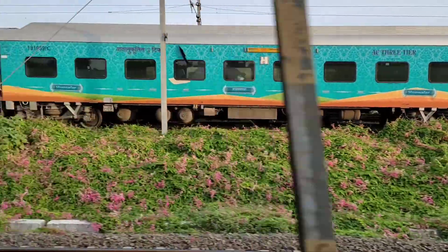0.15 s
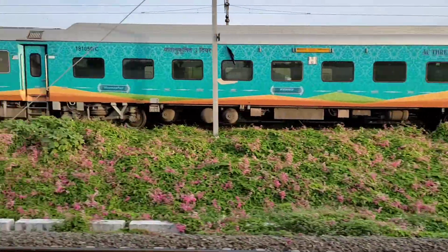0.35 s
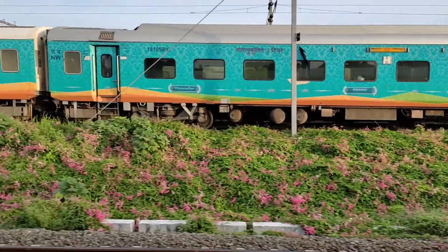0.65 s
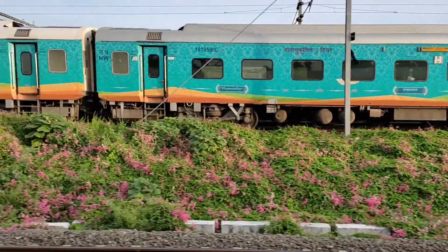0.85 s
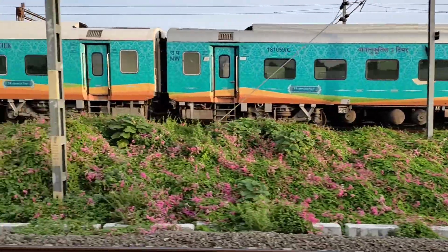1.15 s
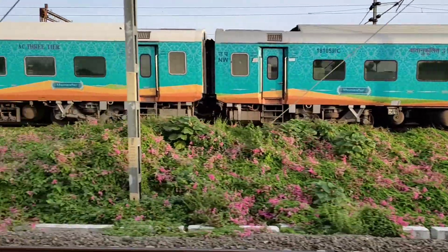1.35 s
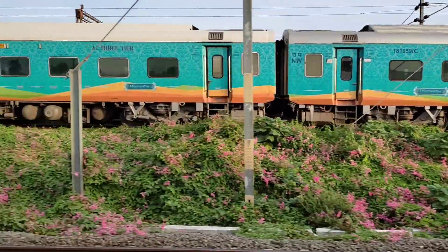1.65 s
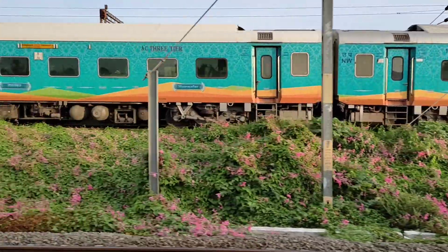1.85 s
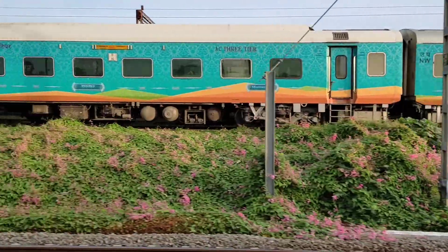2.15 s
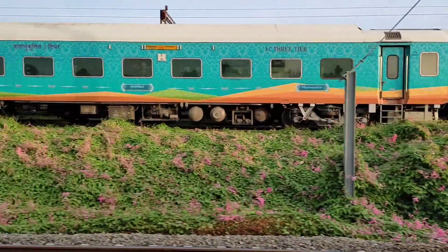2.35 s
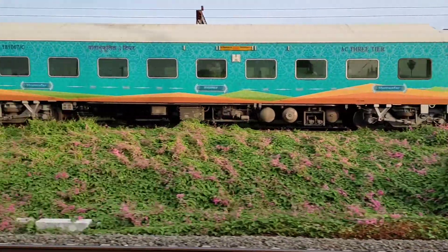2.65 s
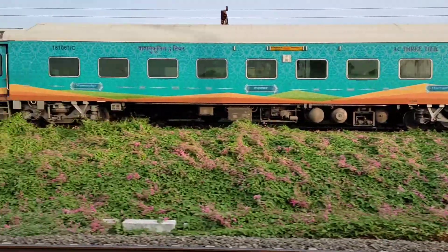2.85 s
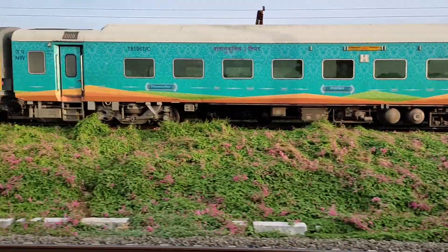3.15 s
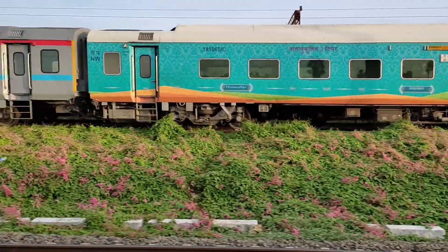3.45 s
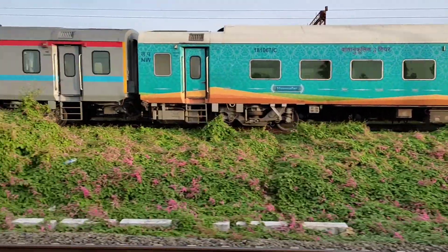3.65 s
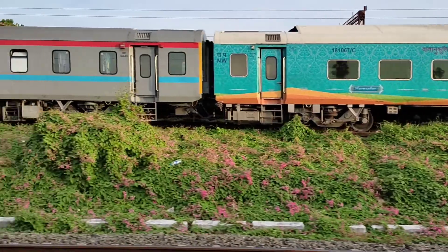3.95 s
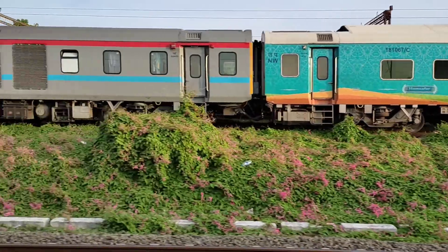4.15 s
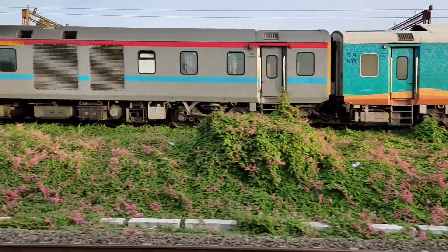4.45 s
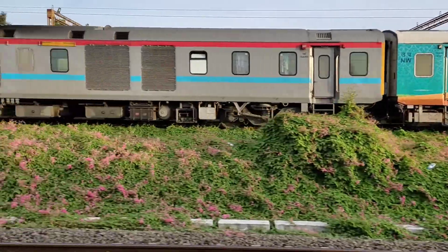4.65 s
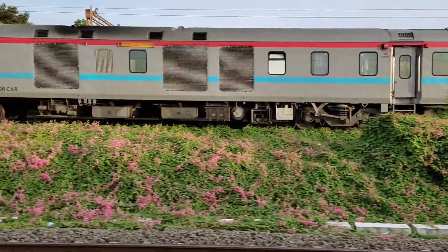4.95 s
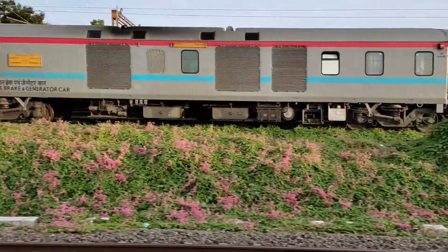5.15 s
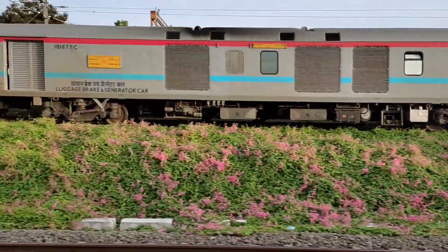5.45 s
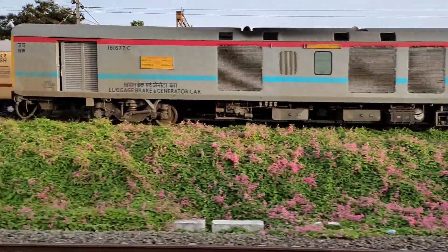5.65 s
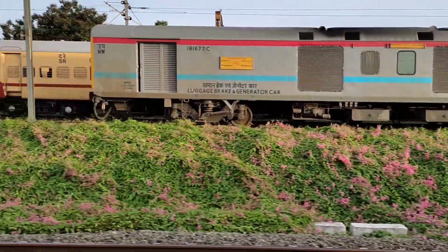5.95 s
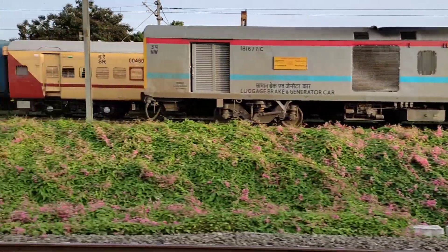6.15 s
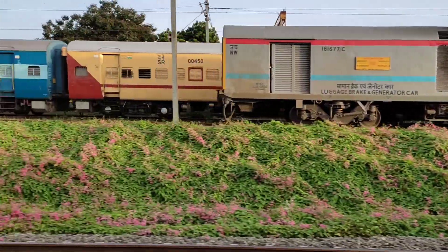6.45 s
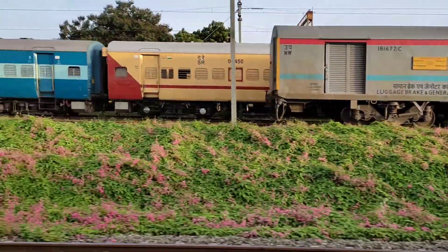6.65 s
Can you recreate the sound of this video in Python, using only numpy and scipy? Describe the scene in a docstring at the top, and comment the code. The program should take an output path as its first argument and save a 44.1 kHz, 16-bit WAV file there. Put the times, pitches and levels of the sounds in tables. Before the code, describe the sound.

Heard from the open door of a moving train, wheels roar steadily on the rails with a thin hiss and a low coach drone. Irregular thumps and rattles mark the rail welds, while gusts of wind buffet and pop on the microphone. About halfway through, the locomotive horn gives a quick high blip, then one short, lower, brassy blast with a slightly higher echo. A strong gust follows, and the rolling continues.

```python
"""A locomotive's horns, heard at the open door of the running train: the high horn blips, then the low
one blows once, its diaphragm chopping air into a brassy stack of harmonics. The blast comes back from
things ahead, raised in pitch by the train's own speed. Underneath, wheels roar on the rails and thump
over welds, bogie by bogie, and the coach drones, while the slipstream buffets the microphone and makes
the gain control duck."""
import sys
import numpy as np
from scipy import signal
from scipy.fft import rfft, irfft, next_fast_len
from scipy.io import wavfile
from scipy.ndimage import uniform_filter1d, minimum_filter1d, map_coordinates

SR = 44100
rng = np.random.default_rng(int(sys.argv[2]) if len(sys.argv) > 2 else 0)


def wav_record(signal):
    """Record a signal, one row per channel, as 16-bit PCM in the file named by sys.argv[1]."""
    frames = np.transpose(np.atleast_2d(signal))
    bounded = np.clip(frames, -1, 1)
    # unit amplitude maps onto the largest positive 16-bit level
    quanta = np.round(bounded * 32767).astype(np.int16)
    wavfile.write(sys.argv[1], SR, quanta)


N = 300223

# rolling bed, as the track grows rougher and smoother: (time [s], relative roar [dB], hiss [dB])
TRACK_ROUGHNESS = [(0, -48, -66), (.3, -51, -61), (1.2, -48, -68.5), (1.7, -49, -65), (1.95, -47.5, -62.5),
                   (2.8, -50, -63.5), (3.2, -46.5, -60), (4.2, -47, -63), (4.8, -46.5, -66),
                   (5.15, -48, -63.5), (6.2, -48, -67.5), (6.81, -50, -65.5)]
# resonances of the coach body and of the wheels: (frequency [Hz], width [Hz], relative level [dB])
COACH_MODES = [(184.8, 69, 16.5), (292, 60, 9.5)]
WHEEL_MODES = [(1150, 270, -6), (1400, 420, -6.5), (1819, 59, 4.5), (2113, 51, 2), (2368, 78, 5),
               (2680, 50, 0.5), (3204, 210, -5.5)]
# wheels hitting rail welds: (time [s], thump gain [dB], relative rattle [dB])
WELD_HITS = [(0.558, 3, -49), (0.843, -0.5, -51), (1.782, 1.5, -49), (2.065, 1.5, -50), (2.507, -24, -56.5),
             (2.872, -5.5, -68), (3.198, 0.5, -42), (4.573, -10.5, -52), (4.842, -4.5, -56),
             (5.908, -9, -58.5)]
# tone of the rail roar, rail hiss and gear rattle: (frequency [Hz], relative level [dB])
ROAR_EQ = [(60, -17), (200, 8), (500, 9), (900, 4.5), (1500, -1), (2500, -4.5), (3200, -12), (3900, -21),
           (5000, -26.5), (8000, -26.5)]
HISS_EQ = [(2000, -32.5), (3500, -6), (4800, -13.5), (5600, -7.5), (6200, 1.5), (7400, 3.5), (8000, -12.5)]
RATTLE_EQ = [(300, -2), (1000, 16.5), (2300, 8), (3500, 0.5), (5000, -8), (6500, -1.5), (8000, -4)]
# slipstream gusts: (start [s], length [s], deep surge [dB], buffet [dB], flutter [dB])
WIND_GUSTS = [(0, 0.12, -19.5, -19, -30.5), (0.139, 0.055, -20.5, -23, -39),
              (0.291, 0.045, -28, -19.5, -26), (0.382, 0.15, -21, -17.5, -28.5),
              (0.811, 0.074, -21.5, -20, -24), (0.915, 0.093, -19, -15, -21),
              (1.057, .025, -16.5, -20.5, -39), (1.151, 0.025, -19, -20.5, -35),
              (1.444, 0.053, -25, -21.5, -39), (1.499, .045, -26, -20.5, -30),
              (2.076, 0.057, -33, -20, -27.5), (2.198, 0.038, -16, -13, -29.5),
              (2.267, 0.077, -21.5, -22.5, -33.5), (2.403, 0.038, -24, -19, -30.5),
              (2.473, 0.05, -32.5, -19, -39.5), (2.589, 0.065, -24.5, -21, -38),
              (2.858, 0.051, -24, -26, -40), (3.184, .21, -22, -19.5, -30.5),
              (3.468, 0.026, -15.5, -27, -40), (3.908, 0.12, -20.5, -18, -51),
              (4.088, 0.019, -34, -16, -29), (4.236, 0.066, -16, -14.5, -28),
              (4.304, 0.11, -10, -8.5, -22.5), (4.509, 0.081, -17.5, -22.5, -30),
              (4.688, 0.049, -21.5, -15, -25), (4.8, 0.028, -17.5, -20.5, -33),
              (5.154, 0.088, -24, -21, -41.5), (5.293, .17, -18.5, -16.5, -29),
              (5.562, 0.11, -29, -20.5, -47), (5.862, 0.055, -21, -20, -31), (5.956, 0.07, -15, -18.5, -28),
              (6.209, .13, -19.5, -20.5, -30), (6.45, 0.1, -18, -18, -25.5),
              (6.603, 0.042, -26, -16.5, -29), (6.79, .04, -20, -15, -24)]
# tone of the wind layers, deepest first: (frequency [Hz], relative level [dB])
SURGE_EQ = [(15, -26), (30, -20), (45, -9), (65, -2), (90, 2), (125, -9.5), (250, -44.5), (600, -83)]
BUFFET_EQ = [(30, -47.5), (70, -19), (110, 1), (180, -3), (260, -8), (400, -21.5), (800, -34), (2000, -76)]
FLUTTER_EQ = [(100, -26), (250, 5), (380, 5), (550, -6), (800, -10.5), (1200, -22.5), (2000, -38),
              (4000, -63.5)]
PUFF_EQ = [(120, -10), (330, 8.5), (500, 6.5), (900, -5.5), (1400, -15), (2200, -31.5), (4000, -52.5),
           (8000, -61)]
# swells of air pressure, too slow to hear: (start [s], peak [dB])
PRESSURE_SWELLS = [(0, -0.5), (0.438, 0.5), (.55, 6), (0.859, -0.5), (.97, 2.5), (2.19, 3.5), (4.27, 7),
                   (4.4, 6.5), (4.59, 5), (5.35, 2.5), (5.948, 1), (6.45, 1.5)]
# hard single eddies hitting the microphone port: (time [s], level [dB])
EDDY_HITS = [(.044, -16.5), (0.13, -19.5), (.464, -20.5), (.492, -21), (.817, -16), (.936, -23),
             (.953, -16), (1.004, -15), (1.507, -23), (2.208, -14.5), (2.281, -21.5), (2.483, -24),
             (2.799, -27), (3.342, -25), (4.1, -27), (4.296, -20.5), (4.361, -11), (4.389, -8.5),
             (4.502, -11.5), (4.509, -10.5), (4.716, -20), (5.173, -15.5), (5.442, -16.5), (5.949, -18),
             (6.233, -18.5), (6.465, -25), (6.621, -17)]
# eddies that overload the microphone: (time [s], relative level [dB])
OVERLOADS = [(1.006, -27), (2.2102, -21), (4.3, -35)]
# the echo's tone, duller from farther off: (frequency [Hz], early level [dB], late level [dB])
ECHO_EQ = [(307, 0, 1), (615, -8, -9), (922, -8, -8), (1230, -11, -14), (1538, -8, -8), (1845, -14, -15),
           (2150, -12, -16), (2460, -15, -19), (2770, -20, -27), (3080, -19, -25), (4000, -23, -34),
           (4800, -38, -47), (6200, -28, -39), (7500, -31, -43)]
# the high horn's blip: (time [s], pitch [Hz], level [dB])
HIGH_HORN_BLIP = [(3.25, 364, -44), (3.28, 364, -22), (3.305, 358.4, -21.5), (3.33, 355, -25.5),
                  (3.36, 369, -42), (3.45, 389, -52.5)]
# the high horn's tone: (frequency [Hz], level [dB])
HIGH_HORN_EQ = [(360, -15), (720, 5), (1080, -32.5), (1440, -20), (2200, -48), (5000, -61)]
# the low horn's bell along a changing path: (frequency [Hz], early level [dB], late level [dB])
LOW_HORN_EQ = [(292, 2, 2), (584, -1, -0.5), (876, -0.5, 1.5), (1168, -2, -3), (1460, -10, -13),
               (1752, -6.5, -9), (2044, -18, -10), (2336, -6, -16), (2630, -18, -19), (2920, -19, -21),
               (3212, -32, -30), (3500, -28, -30), (4100, -39, -37), (4700, -44, -43), (6000, -32, -41),
               (7400, -32, -41)]

TOP_HZ = 7560  # ceiling for the horn harmonics and the whole mix


def amp(db):
    """Decibels to gain."""
    return 10 ** (np.asarray(db) / 20)


def unit(x):
    """Scale to rms 1."""
    return x / np.sqrt(np.mean(x ** 2) + 1e-20)


def along(points, hz):
    """Read (frequency [Hz], value) points on a log axis."""
    freqs, values = np.transpose(points)
    return np.interp(np.log(hz + 1), np.log(freqs + 1), values)


def curves(rows):
    """One automation curve for each column after the time."""
    times, *columns = np.transpose(rows)
    return [np.interp(np.arange(N) / SR, times, column) for column in columns]


def ramp(start, end):
    """Fade from 0 to 1 between two times in seconds."""
    return np.clip((np.arange(N) / SR - start) / (end - start), 0, 1)


def envelope(start, length, attack, release):
    """Rise from the start, hold to the end of the length, then die away (all in seconds)."""
    t = np.maximum(np.arange(N) / SR - start, 0)
    return (1 - np.exp(-t / attack)) * np.exp(-np.clip((t - length) / release, 0, 20))


def wobble(rate):
    """Smooth random modulation, rate knots a second."""
    return map_coordinates(rng.standard_normal(int(N * rate / SR) + 4), [np.arange(N) * rate / SR])


def filtered(x, response):
    """Shape x with a gain that depends on frequency."""
    size = next_fast_len(N + SR // 2)
    return irfft(rfft(x, size) * response(np.fft.rfftfreq(size, 1 / SR)), size)[:N]


def noise(eq):
    """Noise of rms 1 with the given spectrum."""
    return unit(filtered(rng.standard_normal(N), lambda hz: amp(along(eq, hz))))


def steadied(x, seconds):
    """Level out the slow swells of x and keep its fast churning."""
    size = int(seconds * SR)
    power = uniform_filter1d(uniform_filter1d(x ** 2, size), size)
    return x / np.sqrt(np.abs(power) + 1e-9)


def add(track, start, sound):
    """Mix a sound into the track at a start time in seconds."""
    part = track[max(round(start * SR), 0):][:len(sound)]
    part += sound[:len(part)]


def coach():
    """Shaken by the running gear, the coach body drones in step with the roar of the wheels."""
    roar_db, _ = curves(TRACK_ROUGHNESS)
    drone = np.zeros(N)
    for centre, width, db in COACH_MODES:
        band = filtered(rng.standard_normal(N), lambda hz: 1 / (1 + ((hz - centre) / width) ** 2) ** 2)
        drone += amp(roar_db + db) * unit(band)
    return drone


def rolling():
    """Rough steel on steel: a broad roar, the ringing of the wheels and a thin hiss."""
    def wheel_response(hz):
        modes = sum((-1) ** k * amp(db) * 1j * hz * width / (centre ** 2 - hz ** 2 + 1j * hz * width)
                    for k, (centre, width, db) in enumerate(WHEEL_MODES))
        return modes / (1 + (hz / 3300) ** 12)

    roar_db, hiss_db = curves(TRACK_ROUGHNESS)
    ring = unit(filtered(rng.standard_normal(N), wheel_response))
    roar = amp(roar_db + 7 + 1.1 * wobble(16)) * noise(ROAR_EQ)
    return roar + amp(roar_db + 2 * wobble(41)) * ring + amp(hiss_db) * noise(HISS_EQ)


def welds():
    """Each wheel drops over a weld: the coach floor booms and the running gear rattles."""
    out, t = np.zeros(N), np.arange(SR // 4) / SR
    gear = noise(RATTLE_EQ)
    boom_shape = (1 - np.exp(-t / 0.00073)) * amp(-60 * t / 0.05)
    rattle_shape = (1 - np.exp(-t / 0.0025)) * np.exp(-(t / 0.051) ** 2)
    for start, thump_db, rattle_db in WELD_HITS:
        floor_hz = 160 * amp(rng.normal(0, 0.25))
        boom = boom_shape * np.sin(2 * np.pi * floor_hz * t)
        rattle = rattle_shape * gear[rng.integers(N - len(t)):][:len(t)]
        add(out, start, amp(thump_db) * boom + amp(rattle_db + 9.5) * rattle)
    return out


def slipstream():
    """Gusts ride a wavering draught: big eddies surge and buffet the microphone, small ones flutter."""
    draught_db = np.array([[-27.5], [-28.5], [-40]])  # surge, buffet, flutter
    draught = amp(draught_db + 2.2 * wobble(16))
    shapes = np.array([envelope(start, length, attack=0.0056, release=0.02)
                       for start, length, *_ in WIND_GUSTS])
    gust_power = amp(np.array(WIND_GUSTS)[:, 2:]).T ** 2 @ shapes ** 2
    surge_gain, buffet_gain, flutter_gain = np.sqrt(draught ** 2 + gust_power)
    churn = wobble(70)
    surge = steadied(noise(SURGE_EQ), seconds=0.036)
    buffet = steadied(noise(BUFFET_EQ) * amp(2.9 * churn), seconds=0.056)
    flutter = steadied(noise(FLUTTER_EQ) * amp(3.8 * churn + 3.4 * wobble(170)), seconds=0.015)
    return surge_gain * surge + buffet_gain * buffet + flutter_gain * flutter


def swells(length_s=0.15):
    """Hard gusts press on the microphone as slow bumps, strong enough to pump the gain control."""
    return sum(amp(db) * np.sin(np.pi * ramp(start, start + length_s)) ** 2
               for start, db in PRESSURE_SWELLS)


def lesser_eddies(per_gust):
    """Small eddies fall at random through each gust: (time [s], level [dB])."""
    return [(start + length * rng.uniform(), flutter_db + rng.normal(1.5, 2.5))
            for start, length, _, _, flutter_db in WIND_GUSTS for _ in range(per_gust)]


def puffs(push_db=-1):
    """An eddy that hits the microphone port makes a short rough pop on one low push of pressure."""
    out, t = np.zeros(N), np.arange(SR // 20) / SR
    air = noise(PUFF_EQ)
    pop_shape, push_shape = (t / rise_s * np.exp(1 - t / rise_s) for rise_s in (0.0022, 0.0024))
    for start, db in EDDY_HITS + lesser_eddies(per_gust=2):
        # a fresh scrap of turbulence for each eddy, brought to a set energy
        pop = pop_shape * air[rng.integers(N - len(t)):][:len(t)]
        pop *= np.linalg.norm(pop_shape) / np.linalg.norm(pop)
        push_hz = 190 * amp(rng.normal(0, 1.8))
        push = push_shape * np.sin(2 * np.pi * push_hz * t) * rng.choice([-1, 1])
        add(out, start, amp(db) * (pop + amp(push_db) * push))
    return out


def cracks():
    """The microphone's diaphragm bottoms out for an instant: one broad click."""
    out = np.zeros(N)
    click = np.exp(-np.arange(SR // 200) / SR / 0.00012)
    for start, db in OVERLOADS:
        add(out, start, amp(db - 1.5) * click)
    return out


def reed(pitch_hz, eq, morph, fading_db, fading_rate):
    """A horn's diaphragm chops air into harmonics; moving air and ground bounces shift and fade each."""
    phase = 2 * np.pi * np.cumsum(pitch_hz) / SR
    middle_hz = np.median(pitch_hz)
    early, late = np.array(eq)[:, [0, 1]], np.array(eq)[:, [0, -1]]
    tone = np.zeros(N)
    for k in range(1, int(TOP_HZ / middle_hz) + 1):
        harmonic_db = (1 - morph) * along(early, k * middle_hz) + morph * along(late, k * middle_hz)
        depth_db = fading_db * (k / 5) ** (1 / 3)  # short waves are disturbed the most
        shift = rng.uniform(0, 2 * np.pi) + np.log(amp(depth_db)) * wobble(fading_rate)
        tone += amp(harmonic_db + depth_db * wobble(fading_rate)) * np.cos(k * phase + shift)
    return tone


def horn_echo():
    """The train runs at what reflects the blast, so it returns sharp: more from ahead, less aslant."""
    level = amp(-34) * envelope(start=3.494, length=0.47, attack=0.099, release=0.3)
    farther = ramp(3.7, 4.2)
    ahead = reed(307.4 + 1.1 * wobble(150), ECHO_EQ, farther, fading_db=3, fading_rate=18)
    aslant = reed(303.8 + 2 * wobble(150), ECHO_EQ, farther, fading_db=3.5, fading_rate=24)
    return level * (ahead + amp(-3) * aslant)


def trackside_reverb(x, t60):
    """Many small reflections from the embankment and the coaches alongside."""
    t = np.arange(SR) / SR
    tail = rng.standard_normal(SR) * amp(-60 * t / t60)
    return signal.fftconvolve(x, tail / np.linalg.norm(tail))[:N]


def high_horn():
    """The high horn barely speaks: one short blip that sags in pitch and lifts as it fades."""
    t = np.arange(N) / SR
    pitch_hz, level_db = curves(HIGH_HORN_BLIP)
    gate = (t > HIGH_HORN_BLIP[0][0]) * (t < HIGH_HORN_BLIP[-1][0])
    return gate * amp(level_db) * reed(pitch_hz, HIGH_HORN_EQ, morph=0, fading_db=0.5, fading_rate=8)


def low_horn(start=3.335, note_hz=292, sharp_hz=3.5, settle_s=0.035):
    """One full blast: it starts sharp as the air valve opens, then settles on its note."""
    since = np.maximum(np.arange(N) / SR - start, 0)
    pitch_hz = (note_hz + sharp_hz * np.exp(-since / settle_s)) * (1 + 0.0016 * wobble(150))
    level = amp(-27.5) * envelope(start, length=0.44, attack=0.023, release=0.078)
    morph = ramp(3.4, 3.78)
    blast = reed(pitch_hz, LOW_HORN_EQ, morph, fading_db=1.8, fading_rate=30)
    # the bank slides past and throws back a dull, fluttering copy, a little flat
    bank_hz = pitch_hz * (0.988 + 0.008 * wobble(120))
    bank = reed(bank_hz, LOW_HORN_EQ, morph, fading_db=3.5, fading_rate=35)
    bank = filtered(bank, lambda hz: 1 / (1 + (hz / 2400) ** 2))
    return level * (blast + amp(-8) * bank)


def scene():
    """The mono mix at the doorway: wind and running gear, with the horns on top."""
    wind = slipstream() + swells() + puffs() + cracks()
    train = rolling() + coach() + welds()
    horns = high_horn() + low_horn()
    reverb = amp(-13) * trackside_reverb(horns, t60=0.5)
    return (wind + train + horns + reverb + horn_echo())[None]


def record(dry):
    """The gain control ducks past full scale, holds and recovers; then low cut, soft clip, high cut."""
    hold, attack = int(0.05 * SR), int(0.006 * SR)
    recover_db_per_s, low_cut_hz, ceiling = 22, 27, 0.8
    over_db = 20 * np.log10(np.maximum(np.abs(dry[0]), 1))
    duck_db = minimum_filter1d(-over_db, hold, origin=(hold - 1) // 2)
    climb_db = recover_db_per_s * np.arange(N) / SR
    gain_db = np.minimum.accumulate(duck_db - climb_db) + climb_db
    ducked = dry[0] * amp(uniform_filter1d(gain_db, attack))
    trimmed = filtered(ducked, lambda hz: 1 - 1 / (1 + (hz / low_cut_hz) ** 10))
    rounded = trimmed / (1 + (trimmed / ceiling) ** 4) ** (1 / 4)
    return filtered(rounded, lambda hz: 1 / (1 + np.minimum(hz / TOP_HZ, 2) ** 300))[None]


dry = scene()
out = record(dry)
wav_record(out)
```